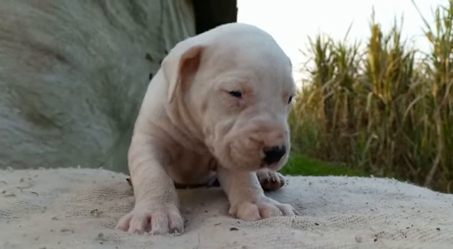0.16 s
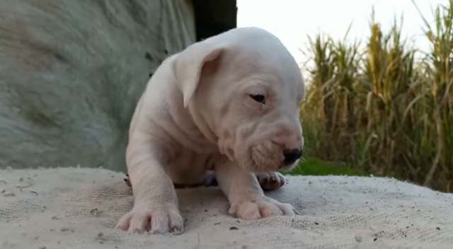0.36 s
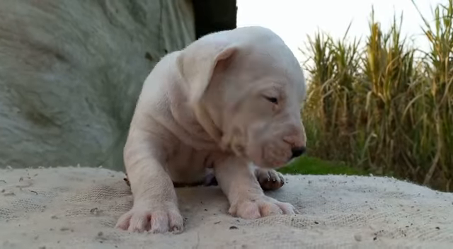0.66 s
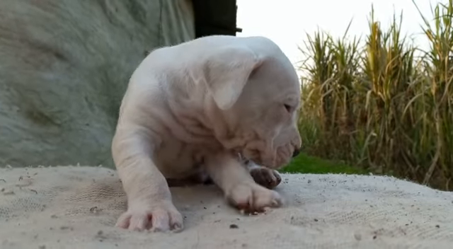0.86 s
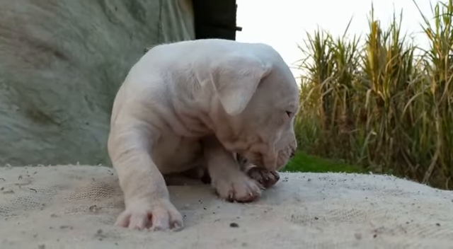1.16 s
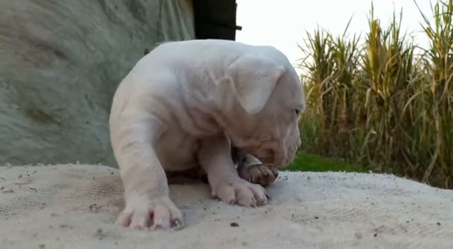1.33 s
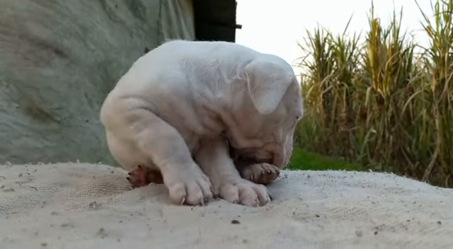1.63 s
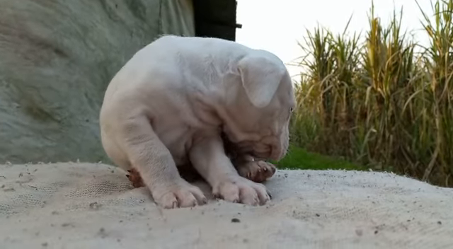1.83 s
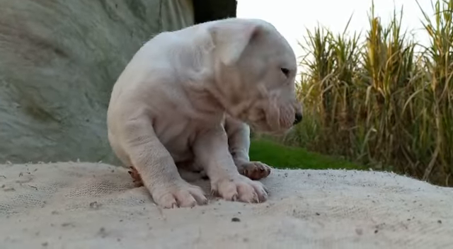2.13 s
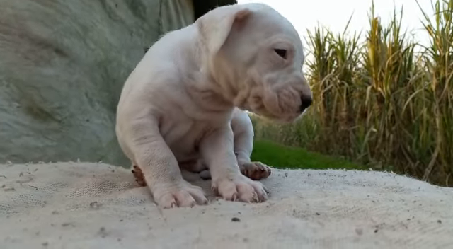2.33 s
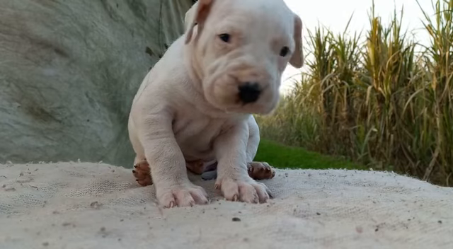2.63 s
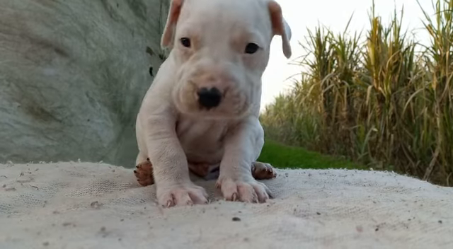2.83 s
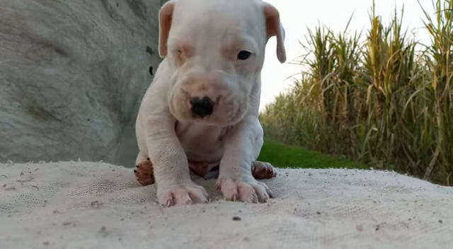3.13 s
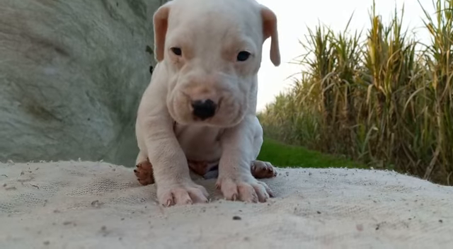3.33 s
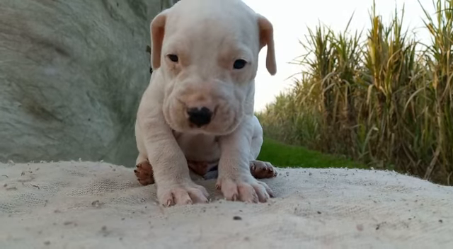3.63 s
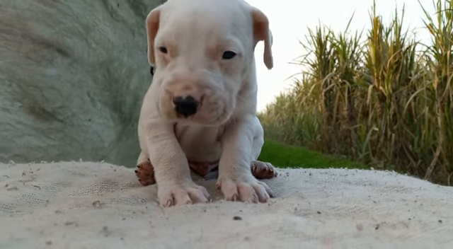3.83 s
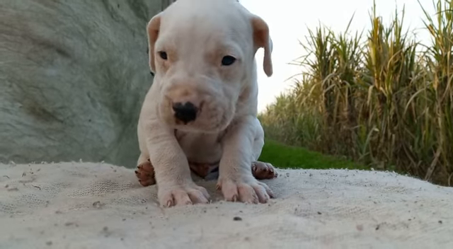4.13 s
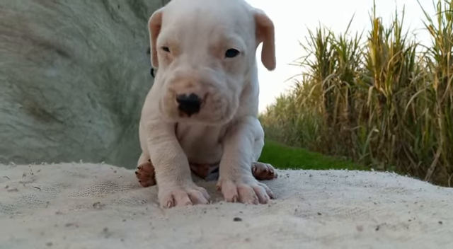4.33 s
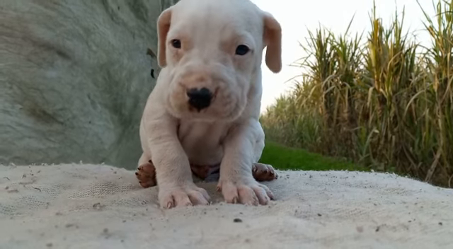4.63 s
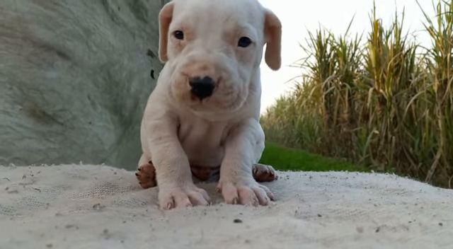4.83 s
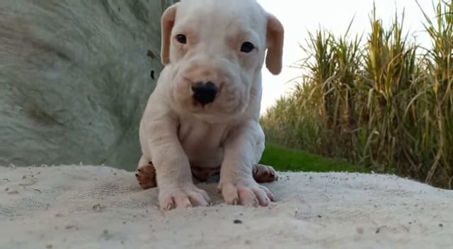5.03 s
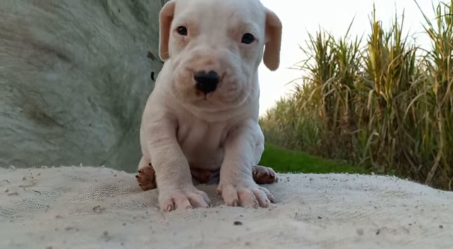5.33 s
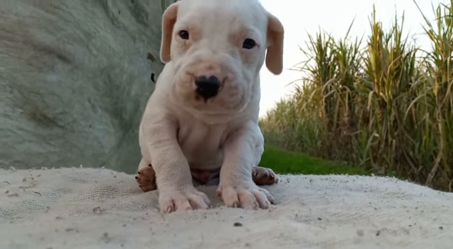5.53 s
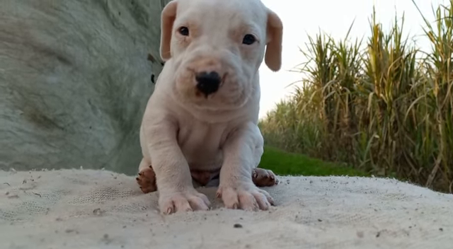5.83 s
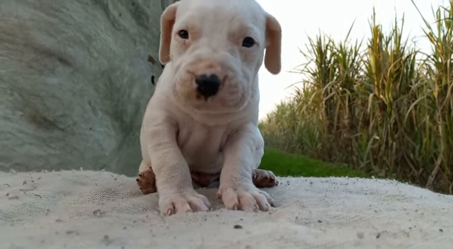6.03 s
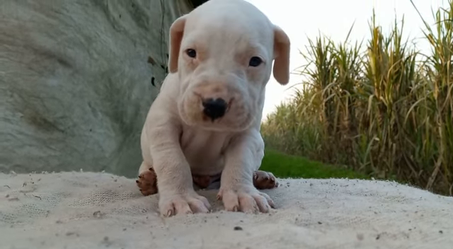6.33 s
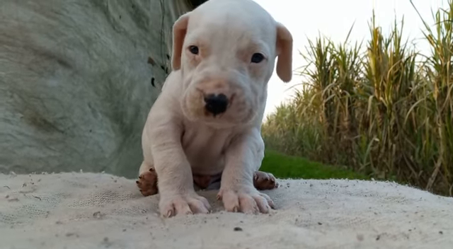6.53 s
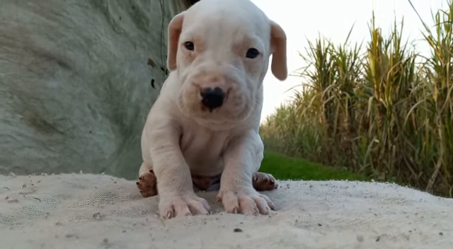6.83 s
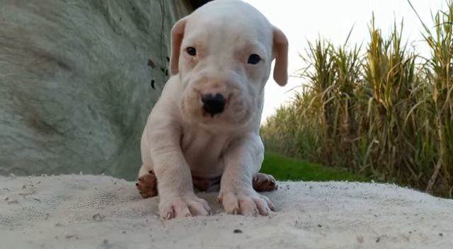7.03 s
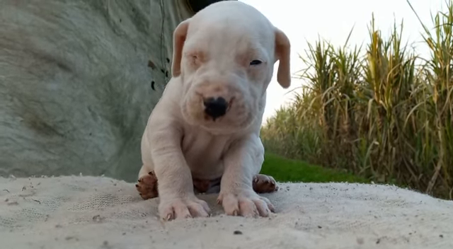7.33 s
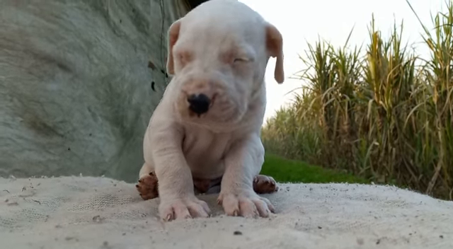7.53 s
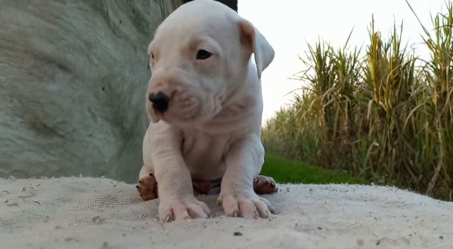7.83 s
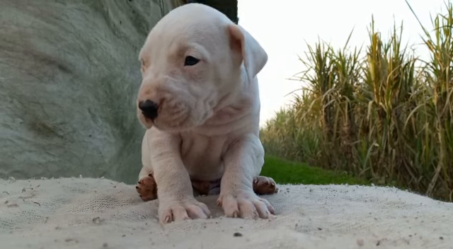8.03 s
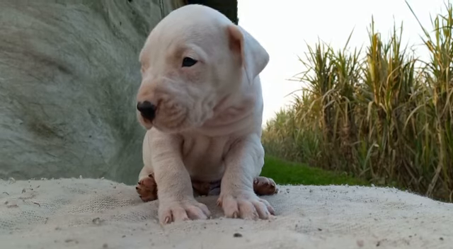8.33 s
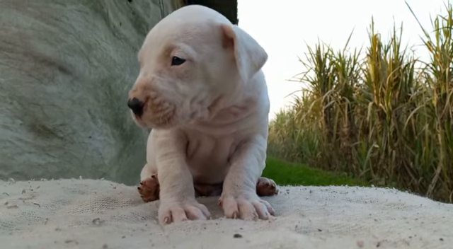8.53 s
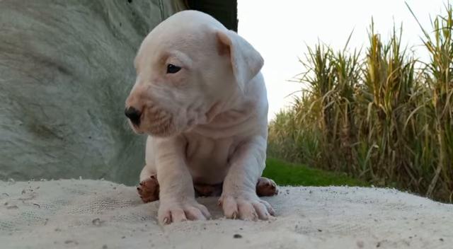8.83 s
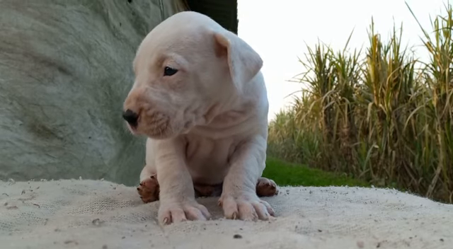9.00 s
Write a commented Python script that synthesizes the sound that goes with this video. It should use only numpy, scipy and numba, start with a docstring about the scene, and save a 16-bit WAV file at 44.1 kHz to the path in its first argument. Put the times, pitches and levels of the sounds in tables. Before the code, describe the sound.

Outdoors, a small puppy an arm's length from a phone microphone whimpers through its nose, first in quick wavering cries, then brighter, longer whines, ending in weaker broken ones. Far engines hum low and fields hiss softly. A faint insect sings early, two tiny ticks follow, then a second puppy cries briefly, a small bird whistles, and a distant crow caws twice.

```python
"""From the start far engines hum and fields hiss; soon a puppy, on a blanket an arm's length from a phone,
whimpers through its nose: overtones filtered by nose and mouth, with creaky pulses as many cries start.
An insect sings as a narrow noise band, and two ticks are short noise bursts. Later a second, farther puppy
wavers, a small bird whistles with overtones, breathy noise squeaks, and a distant crow caws as pulses
through a throat. Puppy, bird, squeak and crow are also echoed."""
import sys
import numpy as np
from scipy import signal
from scipy.io import wavfile
from scipy.ndimage import uniform_filter1d, minimum_filter1d
from numba import njit

SR = 44100
rng = np.random.default_rng(int(sys.argv[2]) if len(sys.argv) > 2 else 0)


def generate_wav(sig):
    """Save sig (samples, or channels by samples) to the path in sys.argv[1] as 16-bit PCM at SR."""
    pcm = np.round(np.clip(np.atleast_2d(sig).T, -1, 1) * 32767).astype(np.int16)
    wavfile.write(sys.argv[1], SR, pcm)


N = 403956  # samples

# The puppy's cries. Each row: start in seconds, growing time in seconds, sinking time in seconds,
# top level in dB, drop at the start in dB, drop at the end in dB, creak after the start in seconds,
# overtones against the fundamental in dB, mouth opening in dB, treble against the voice in dB.
CRIES = [ (0.239, .205, .072, -31, 5, 1.5, 0.066, -6.5, -7.5, -35),
         (0.794, 0.11, 0.028, -26, 7, 2.5, 0.035, -4.5, -5.5, -29.5),
         (1.166, 0.15, 0.028, -28.5, 6.5, 0.47, 0.084, -11, -2, -28),
         (1.51, 0.17, 0.02, -30, 8, 1.5, .175, -9, -14, -23),
         (1.86, 0.2, 0.014, -26, 11.5, 1.7, 0.095, -8, 2, -26.5),
         (2.244, 0.25, .014, -24, 10, 1.07, 0.003, -9.5, 8.5, -19.5),
         (2.65, 0.19, 0.32, -24.5, 10, 1, 0.047, -8.5, -4, -22),
         (3.374, 0.2, .032, -27, 15, 4, 0.0081, 3.5, -4.5, -19.5),
         (3.804, 0.21, 0.086, -24.5, 16, 1.5, 0, -0.5, -2, -16),
         (4.277, 0.273, 0.015, -29.5, 12, 2, 0, 2, 2.5, -10),
         (4.733, 0.307, .016, -33, 9, 2, 0, 6, -9, -5.5),
         (5.218, .46, .008, -26, 13, 0.5, 0.017, -1, -10, -9),
         (5.764, .018, 0.1, -26, 8, 22, 0, -28, 4.5, -26),
         (5.894, .003, 0.0038, -29, 0, 2, 0.058, -14.5, -6, -33),
         (5.914, 0.4, 0.145, -23, 4, 5, 0, -5, -19.5, -21),
         (7.028, .014, .022, -34, 1.5, 5, .045, -10, -10, -28),
         (7.081, .099, .206, -29, 4, 2.5, 0.15, -14.5, 1.5, -28),
         (7.565, 0.092, .1, -17, 9, 20, 0, 0.5, 12, -47),
         (7.78, 0.122, .012, -22.5, 5.5, 2, 0, -11, 11, -44),
         (7.925, .021, 0.16, -31, 0.46, 2.5, .17, -14, 1, -24),
         (8.105, 0.024, .12, -31.5, 0, -0.5, 0.0044, -20.5, 12.5, -30),
         (8.585, 0.057, .1, -34.5, 3.1, 4, .003, -8, 0, -40),
         (8.755, 0.073, 0.019, -33.5, 3.5, -1.5, 0.072, -11, -6, -37), ]
TOP_HZ = 15720  # upper limit of the overtones and of the phone


def undb(db):
    """Decibels are logarithmic: 20 dB is a tenfold amplitude."""
    return 10 ** (np.asarray(db) / 20)


def unit(x):
    """Normalization to an RMS of 1."""
    return x / np.sqrt(np.mean(x ** 2))


def tint(table, hz):
    """Spectral envelope: dB of a (Hz, dB) table, straight on a log-frequency axis."""
    f, db = np.transpose(table)
    return np.interp(np.log(hz), np.log(f), db)


def curves(tables, rise=0.013, fall=0.0066):
    """Envelopes: columns of all tables over time, and a gate that opens before each table and closes after it."""
    t = np.arange(N) / SR
    rows = np.concatenate(tables).T
    gate = 0
    for table in tables:
        before = (t - table[0][0]) / rise
        after = (table[-1][0] - t) / fall
        gate = gate + np.clip(1 + np.minimum(before, after), 0, 1) ** 2
    return [np.interp(t, rows[0], column) for column in rows[1:]] + [np.minimum(gate, 1)]


def calls(rows):
    """Amplitude envelope of calls that swell and sink: level, gate, age and each further column held through its call."""
    t, rows = np.arange(N) / SR, np.array(rows)
    ends = rows[:, :3].sum(axis=1)
    now = np.searchsorted((rows[1:, 0] + ends[:-1]) / 2, t)  # rows change midway between calls
    start, grows, sinks, top_db, swell_db, sink_db, *held = rows[now].T
    age = t - start
    # exponent over 1: a call grows fast at first, then levels off
    swell = swell_db * np.clip(1 - age / grows, 0, 1) ** 1.4
    sink = sink_db * np.clip((age - grows) / sinks, 0, 1)
    *_, gate = curves([[(a, 0), (b, 0)] for a, b in zip(rows[:, 0], ends)])
    held = [uniform_filter1d(column, size=200) for column in (top_db, *held)]
    return uniform_filter1d(top_db - swell - sink, size=200), gate, age, held


def walk(rate):
    """Random modulation: levels held 1 / rate seconds, then smoothed twice; RMS 1."""
    k = int(SR / rate)
    steps = np.repeat(rng.standard_normal(N // k + 1), k)
    return unit(uniform_filter1d(uniform_filter1d(steps, k), k)[:N])


@njit
def svf(x, hz, width):
    """Resonance: a state-variable band-pass with a moving centre, gain 1 there."""
    y, b, l = np.empty(len(x)), 0., 0.  # output, band-pass state, low-pass state
    for i in range(len(x)):
        g, k = np.tan(np.pi * hz[i] / SR), width / hz[i]
        v = (b + g * (x[i] - l)) / (1 + g * (g + k))
        b, l, y[i] = 2 * v - b, l + 2 * g * v, k * v
    return y


def band(x, hz, width):
    """A single resonance, at a fixed or moving centre in Hz."""
    return svf(x, hz + np.zeros(N), float(width))


def steep(x, hz, width):
    """Cascaded resonance: the same band-pass three times, RMS 1."""
    return unit(band(band(band(x, hz, width), hz, width), hz, width))


def pulses(hz, scatter, scatter_db):
    """Pulse-train excitation: one click a cycle, with jitter of period and shimmer of size."""
    cycle = np.floor(np.cumsum(hz * np.exp(scatter * walk(300))) / SR)
    return np.diff(cycle, prepend=0) * undb(scatter_db * rng.standard_normal(N))


def late(x, s):
    """Propagation delay of s seconds, interpolated between samples."""
    return np.interp(np.arange(N) - s * SR, np.arange(N), x)


def field():
    """Diffuse noise: half-octave bands that flicker independently, with the bass alike left and right."""
    # Spectral density of the far noise. Each row: frequency in Hz, relative level in dB per Hz.
    spectrum = [(45, -24.5), (80, -0.5), (200, -11), (400, -26), (1700, -27.5), (2500, -36), (6500, -44),
                (7600, -55), (15000, -56.5)]
    # Swell of the far noise. Each row: time in seconds, rumble in dB, mid hiss in dB, treble in dB.
    swell = [(0, -42, -52, -63), (3.3, -45, -54, -63.5), (5.5, -47, -49.5, -70.5), (6.7, -41, -44, -61.5),
             (9.16, -39.5, -42, -52)]
    groups = np.zeros((3, 2, N))  # rumble, mid hiss, treble
    for hz in 32 * 2 ** np.arange(0, 9.5, 1 / 2):
        alike = np.clip(1.05 - hz / 800, 0, .97)  # correlation of left and right
        mid, side = (np.sqrt(hz) * steep(rng.standard_normal(N), hz, 0.66 * hz) for _ in range(2))
        pair = np.sqrt(1 + alike) * mid + np.sqrt(1 - alike) * side * np.array([[1], [-1]])
        groups[int(hz > 350) + int(hz > 2600)] += pair * undb(tint(spectrum, hz) + 1.2 * walk(5))
    *levels, _ = curves([swell])
    return sum(unit(group) * undb(level_db) for group, level_db in zip(groups, levels))


def hums():
    """Periodic radiation: engine drones as sines that waver a little, and a thin whine of resonant noise above."""
    # Two engine drones. Each row: time in seconds, frequency in Hz, level in dB before panning.
    drones = [
        [(0, 117.7, -44.5), (3.2, 127.9, -47.5)],
        [(3.6, 109.2, -50), (6.5, 108, -42.5), (9.16, 108.2, -40)],
    ]
    hz, db, gate = curves(drones)
    phase = 2 * np.pi * np.cumsum(hz * (1 + .006 * walk(8))) / SR
    drone = np.sin(phase) * undb(db + 1.8 * walk(6))
    whine = undb(-59.5) * unit(band(rng.standard_normal(N), 266.9, 6.0))  # centre and width in Hz
    return np.sqrt(2) * gate * drone + whine


def puppy():
    """Source and filter: overtones shaped by the nose, crossfaded into uneven pulses where the voice creaks."""
    # Pitch of the voice where it turns. Each row: time in seconds, frequency in Hz.
    pitch = [(0.3, 558), (0.324, 629), (0.36, 589), (0.444, 681), (0.492, 660), (0.516, 762),
             (0.794, 780.6), (0.842, 719), (0.87, 758), (0.902, 724), (0.93, 787), (1.23, 638), (1.3, 726),
             (1.332, 883.3), (1.688, 856.6), (1.864, 911), (1.95, 721), (2.04, 675.6), (2.076, 722),
             (2.292, 784), (2.42, 682.7), (2.74, 618), (2.848, 639.7), (2.9, 600), (3.092, 648),
             (3.374, 929), (3.4, 839), (3.45, 890), (3.514, 744), (3.542, 811), (3.57, 747), (3.602, 825),
             (3.856, 916), (3.896, 731), (3.936, 775), (4.06, 698), (4.084, 746), (4.284, 922.5),
             (4.412, 941), (4.528, 895), (4.58, 660), (4.74, 959), (4.872, 1025), (5.025, 960), (5.07, 740),
             (5.234, 858.7), (5.29, 953), (5.414, 972.4), (5.642, 861), (5.7, 700), (5.766, 533.4),
             (5.88, 545), (5.915, 616), (5.95, 644.6), (6.09, 605.2), (6.342, 647), (6.426, 609),
             (6.465, 540), (7.09, 539), (7.25, 597.5), (7.314, 509.6), (7.382, 550.6), (7.566, 852.3),
             (7.625, 957), (7.665, 773.6), (7.7, 681), (7.842, 719.6), (7.906, 557.5), (8.022, 685.4),
             (8.114, 609), (8.242, 597), (8.585, 747.3), (8.825, 718)]
    # Strength of an overtone leaving the nose. Each row: frequency in Hz, relative level in dB.
    nose = [(1000, -6), (1900, -12), (2300, -31), (2900, -32), (4100, -19.5), (5500, -27.5), (6600, -37.5),
            (8700, -53.5), (12000, -48), (14500, -65.5)]
    # Further creaks, most inside a cry. Each row: from and to in seconds, share added to the creak (0-1),
    # mouth resonance in Hz.
    voice_breaks = [(0.345, 0.374, 0.48, 1560), (3.435, 3.478, .35, 1560), (7.662, 7.761, .7, 1450),
                    (7.84, 7.915, .3, 2000), (8.6, 8.74, .4, 1560)]
    # The folds skip: one strong cycle in every few. Each row: from and to in seconds, cycles per beat.
    skips = [(2.24, 2.282, 3), (2.282, 2.32, 2), (3.432, 3.478, 3), (3.804, 3.836, 4), (4.276, 4.302, 3)]
    hz, _ = curves([pitch])
    db, gate, age, (top_db, creak_s, over_db, mouth_db, bright_db) = calls(CRIES)
    t = np.arange(N) / SR

    creak = .85 * (age > -creak_s) * (age < creak_s)
    ring_hz = 1620  # mouth resonance on the creak, outside the breaks
    for start, end, share, break_hz in voice_breaks:
        during = (t >= start) & (t < end)
        creak = creak + share * during
        ring_hz = ring_hz + (break_hz - 1620) * during
    creak = np.clip(uniform_filter1d(creak, 400), 0, 1)  # power share of the creak

    hz = uniform_filter1d(hz, 700)  # the larynx rounds every turn of pitch
    jitter = 0.00461 * walk(35) + 0.0309 * creak * walk(150)
    phase = 2 * np.pi * np.cumsum(hz * (1 + jitter)) / SR
    on = gate > 0
    tone, power = np.zeros((2, N)), np.zeros((2, N)) + 1e-12  # rows: below and above 2.6 kHz
    for k in range(1, 26):
        f = k * hz[on]
        mouth = np.exp(-(np.log(f / 1550) / .25) ** 2)  # an opening mouth lifts a resonance near 1.6 kHz
        overtone_db = tint(nose, f) + mouth * mouth_db[on] + (k > 1) * over_db[on]
        a = undb(overtone_db) * (f < TOP_HZ)
        high = np.clip((f - 2300) / 600, 0, 1)
        a *= undb(3.5 * high * walk(22)[on])  # each high overtone comes and goes on its own
        for row, share, counted in ((0, 1 - high, 0.47), (1, high, f < 7500)):
            tone[row, on] += a * share * np.sin(k * phase[on])
            power[row, on] += (a * share) ** 2 / 2 * counted
    tone /= np.sqrt(power)

    skip = 0
    for start, end, cycles in skips:
        during = uniform_filter1d(1. * (t >= start) * (t < end), size=300)
        skip = skip + during * np.cos(phase / cycles)
    tone[0] += .75 * band(skip * tone[0], 1050, 1100)

    # creak pulses come faster with effort: 170.2 Hz at -33 dB, an octave up per 6 dB
    effort_octaves = np.clip((db + 33) / 6, -1, .6)
    beats = pulses(170.2 * 2 ** effort_octaves, .1, 2.5)
    low = steep(beats, 1.05 * hz, 520)
    low += undb(-9.5 + 0.54 * mouth_db) * steep(beats, ring_hz, 300)  # the open mouth rings on the creak too

    # air rushing through the nose, puffed once a cycle
    air = rng.standard_normal(N) * (1 + np.cos(phase))
    mid_air, top_air = (steep(air, f, 4200) for f in (5300, 11600))
    clean = np.sqrt(1 - creak)
    waver = undb(5 * np.sqrt(creak) * walk(110))  # a breaking voice wavers
    voice = clean * waver * tone[0] + np.sqrt(creak) * low
    treble = clean ** 2 * tone[1] + (0.097 + 0.26 * np.sqrt(creak)) * mid_air + undb(-24.5) * top_air

    fade = int(.012 * SR)  # the treble opens late and closes early
    opens = uniform_filter1d(minimum_filter1d(gate, fade), fade)
    treble_db = top_db + .7 * (db - top_db) + bright_db  # it joins 0.7 of the swell in dB
    return gate * undb(db) * voice + opens * undb(treble_db) * treble


def two_ports(x):
    """Interaural-like delay and shadow: the right port hears the puppy later, with a dip near 1.9 kHz facing front.

    The brighter the cry, the more the highest treble leans to the left port."""
    # Where the head is. Each row: time in seconds, lag of the right in microseconds,
    # left minus right in dB apart from the shading.
    head = [(2.0, 55, 2.5), (2.6, 160, 3), (7.4, 160, 2.8), (7.55, 305, -2.5), (7.79, 215, 2.5)]
    lag_us, pan_db, _ = curves([head])
    bright_db = calls(CRIES)[-1][-1]
    shade_db = np.clip(2 * (bright_db + 25.5), -4, 11)  # left minus right, above 9 kHz
    highest = signal.sosfilt(signal.butter(4, 9000, "high", fs=SR, output="sos"), x)
    rest = signal.sosfilt(signal.butter(4, 9000, fs=SR, output="sos"), x)
    left = rest + highest * undb(shade_db / 2)
    facing_front = lag_us < 200
    shaded = rest - .55 * facing_front * band(rest, 1880, 700)
    right = late(shaded, lag_us * 1e-6) + highest * undb(-shade_db / 2)
    return np.array([left * undb(pan_db / 2), right * undb(-pan_db / 2)])


def insect():
    """Narrow-band noise: its few random components beat, so the line throbs."""
    # Song level. Each row: time in seconds, level in dB before panning.
    song = [(1.15, -63.5), (2.9, -63.5), (3.5, -74)]
    db, gate = curves([song])
    return gate * undb(db) * steep(rng.standard_normal(N), 3465, 46)  # centre and width in Hz


def ticks():
    """Transients: broad noise bursts that decay exponentially within a few ms."""
    # Two short ticks. Each row: start in seconds, level at the onset in dB before the two ports.
    onsets = [(4.446, -30), (4.571, -28)]
    t = np.arange(N) / SR
    shape = sum(undb(db) * (t >= s) * np.exp(-np.abs(t - s) / 0.0029) for s, db in onsets)
    return shape * steep(rng.standard_normal(N), 1440, 2560)


def other_puppy():
    """Harmonic tone with frequency and amplitude modulation: a wavering fundamental and one overtone."""
    # A second, farther puppy, two cries. Each row: time in seconds, frequency in Hz,
    # level of the fundamental in dB before wavering and panning, left minus right in dB.
    cries = [
        [(5.782, 710, -27, -7), (5.805, 795, -36.5, -12), (5.885, 790, -41, -5)],
        [(6.31, 734, -32, 7), (6.44, 690, -48, 8)],
    ]
    hz, db, pan_db, gate = curves(cries)
    phase = 2 * np.pi * np.cumsum(hz * (1 + .025 * walk(90))) / SR
    wave = np.sin(phase) + undb(-11) * np.sin(2 * phase)
    tone = np.sqrt(2) * gate * undb(db + 3.9 * walk(90)) * wave
    return tone * undb(np.array([pan_db, -pan_db]) / 2)


def whistles():
    """Harmonic series under a fixed spectral envelope: a fluttering tone whose partials are lifted near 4 kHz."""
    # Bird calls. Each row: start in seconds, growing time in seconds, sinking time in seconds,
    # top level in dB before the beak and flutter, drop at the start in dB, drop at the end in dB.
    songs = [(5.815, 0.037, 0.077, -39, 7, 17), (6.02, 0.18, 0.15, -41, 8, 13),
             (6.44, 0.12, 0.044, -49, 4, 8), (6.63, 0.14, 0.12, -56, 2, 37),
             (8.51, 0.065, 0.031, -46, 9, 5)]
    # Pitch of the whistle. Each row: time in seconds, frequency in Hz.
    pitch = [(5.835, 4376), (5.85, 3753), (5.92, 3625), (6.02, 2434), (6.08, 3210), (6.2, 3050),
             (6.28, 3370), (6.43, 2490), (6.535, 3040), (6.6, 2420), (6.76, 2492), (6.82, 2310),
             (8.51, 4100), (8.567, 3970), (8.6, 3260)]
    # Strength of a partial leaving the beak. Each row: frequency in Hz, gain in dB.
    beak = [(2400, 0.5), (3200, -13.5), (4000, 5), (6500, -6), (8000, -22), (15500, -26)]
    hz, _ = curves([pitch])
    db, gate, *_ = calls(songs)
    phase = 2 * np.pi * np.cumsum(uniform_filter1d(hz, 600) * (1 + 0.012 * walk(200))) / SR
    tone = sum(undb(tint(beak, k * hz)) * np.sin(k * phase) for k in range(1, 5))
    return np.sqrt(2) * gate * tone * undb(db + 3. * walk(70))


def squeak():
    """Turbulence noise through a gliding resonance: air through a narrow gap."""
    # A breathy squeak. Each row: time in seconds, centre frequency in Hz, level in dB before the echo.
    glide = [(7.93, 5060, -50.5), (8.07, 4648, -53.5)]
    hz, db, gate = curves([glide])
    return gate * undb(db) * steep(rng.standard_normal(N), hz, 730)


def crow():
    """Source and filter: nearly steady pulses excite the narrow resonances of a throat."""
    # Caws. Each row: from and to in seconds, pulse rate at the start and at the end in Hz,
    # level in dB before the echo and the left cut.
    caws = [(8.36, 8.577, 103.2, 96, -45), (8.937, 9.203, 97.1, 86, -43)]
    # Throat resonances. Each row: frequency in Hz, width in Hz, relative level in dB.
    throat = [(1366, 370, 16.5), (1700, 500, 15.5)]
    tables = [[(start, hz0, db), (end, hz1, db)] for start, end, hz0, hz1, db in caws]
    hz, db, gate = curves(tables, rise=0.02, fall=0.055)
    beats = pulses(hz, .003, 1.5)
    voice = unit(sum(undb(d) * steep(beats, f, width) for f, width, d in throat))
    return gate * undb(db) * voice


def echo(x, t60=0.14):
    """Reverberation: scattered reflections from the wall and the cane, other ones each side, 60 dB down after t60 s."""
    t = np.arange(SR // 2) / SR
    tail = rng.standard_normal((2, SR // 2)) * np.exp(-np.log(1000) * t / t60)
    tail /= np.sqrt(np.sum(tail ** 2, axis=1))[:, None]
    return signal.fftconvolve(x[None], tail, axes=1)[:, :N]


def scene():
    """Superposition: direct sounds, their echoes and the far background add up left and right."""
    pup, bird, caw = puppy(), whistles() + squeak(), crow()
    far = np.array([bird + caw * undb(-7.5), late(bird, 90e-6) + caw])
    wet = echo(undb(-19) * pup + undb(5) * bird + caw)
    background = hums() * undb([[1.5], [0]]) + insect() * undb([[-2.], [2.1]])
    return two_ports(pup + ticks()) + other_puppy() + far + wet + background + field()


def record(dry):
    """Band limiting: the phone cuts the deepest bass and the top."""
    dry = signal.sosfilt(signal.butter(3, 48, "high", fs=SR, output="sos"), dry)
    return signal.sosfilt(signal.ellip(10, .5, 80, TOP_HZ, fs=SR, output="sos"), dry)


dry = scene()
out = record(dry)
generate_wav(out)
```